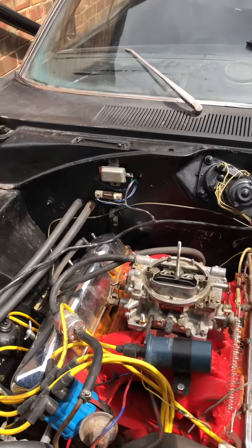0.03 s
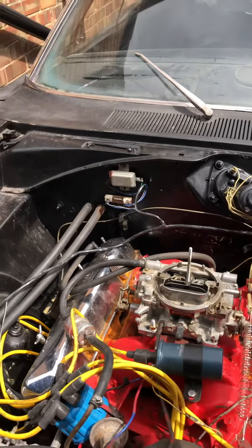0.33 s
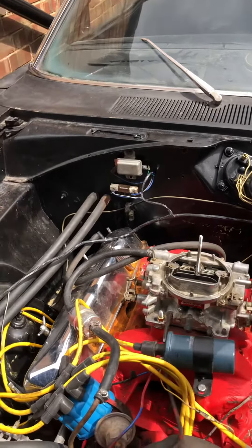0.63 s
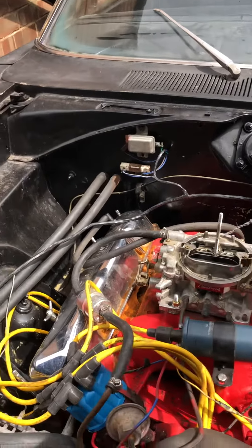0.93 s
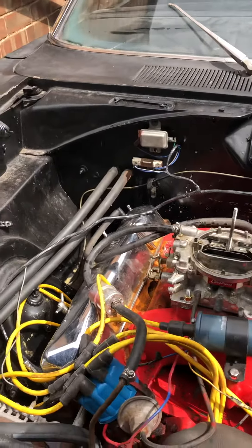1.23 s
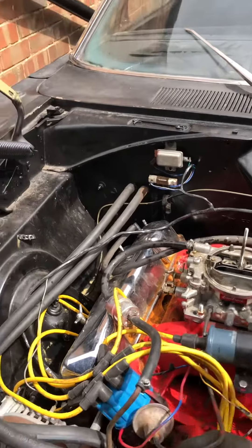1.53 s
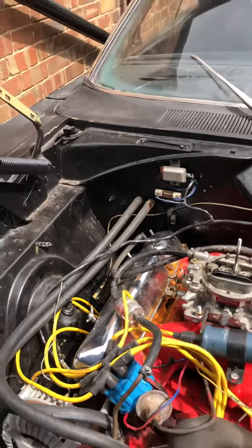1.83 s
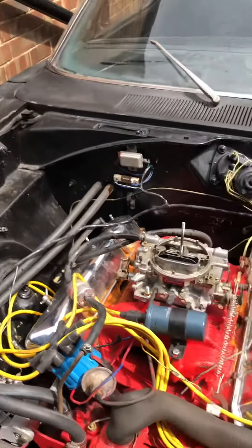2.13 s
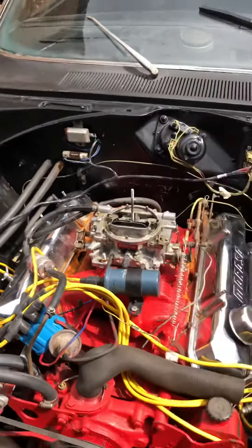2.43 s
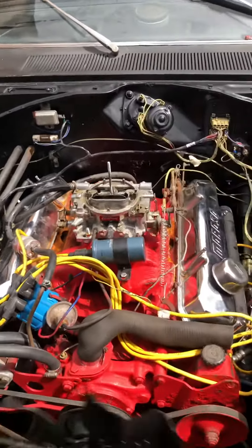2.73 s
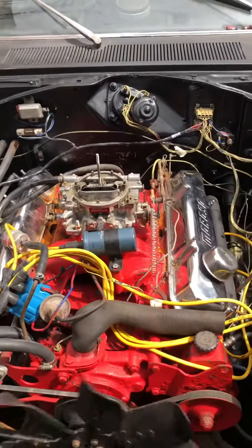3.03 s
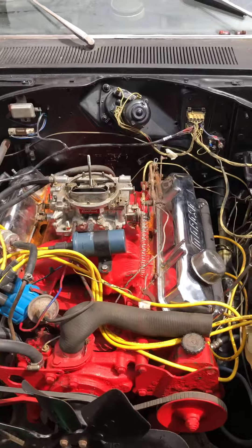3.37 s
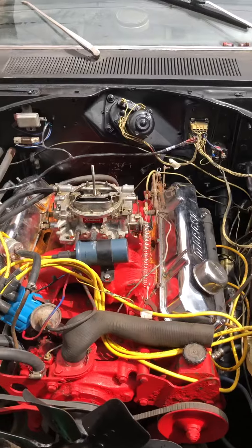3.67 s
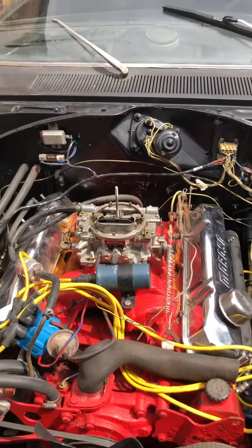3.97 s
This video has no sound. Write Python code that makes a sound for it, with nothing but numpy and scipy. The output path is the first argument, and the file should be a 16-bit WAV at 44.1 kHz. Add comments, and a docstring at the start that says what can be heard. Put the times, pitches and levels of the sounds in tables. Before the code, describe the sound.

A V8 engine catches with whistling gulps of air, then runs raggedly with uneven exhaust thumps and sharp carburettor spits. It stalls with a low hum and a light clack, heard outdoors close over the open engine bay.

```python
"""Beside a brick wall, close over an open engine bay, a V8 catches, runs raggedly and stalls.
The bare carburettor gulps air and whistles, rushes, then spits in separate bursts, while uneven
firings thump in the exhaust pipe and shake the bay's panels. The belt chirps now and then.
At the end the exhaust hums out and the crank rocks back with a last clack."""
import sys
import numpy as np
from scipy import signal
from scipy.fft import rfft, irfft
from scipy.io import wavfile
from scipy.ndimage import uniform_filter1d

SR = 44100
rng = np.random.default_rng(int(sys.argv[2]) if len(sys.argv) > 2 else 0)


def wav_out(sig):
    """Save sig, one row per channel (or a flat mono array), as 16-bit PCM at SR to the path in sys.argv[1]."""
    wavfile.write(sys.argv[1], SR, np.round(np.clip(np.atleast_2d(sig).T, -1, 1) * 32767).astype(np.int16))


N = 176400
T = np.arange(N) / SR


def amp(db):
    """Turns decibels into a number to multiply by."""
    return 10 ** (np.asarray(db) / 20)


def unit(x):
    """Scales a signal to an average (rms) size of 1."""
    return x / np.sqrt(np.mean(x ** 2) + 1e-20)


def curve(points):
    """Draws straight lines through (time [s], value) points."""
    return np.interp(T, *np.transpose(points))


def phase(hz):
    """The angle a wave has turned through at a steady or moving pitch."""
    return 2 * np.pi * np.cumsum(hz * np.ones(N)) / SR


def wander(hz):
    """A smooth random wobble; a higher hz makes it quicker."""
    keep_slow = np.exp(-(np.fft.rfftfreq(N, 1 / SR) / hz) ** 2)
    return unit(irfft(rfft(rng.standard_normal(N)) * keep_slow, N))


def noise(colour, patchy_db=0):
    """Noise with a given balance of low and high pitches, and shifting patches like swirling air."""
    _, _, spectra = signal.stft(rng.standard_normal(N), SR, nperseg=512, noverlap=384)
    patches = uniform_filter1d(rng.standard_normal(spectra.shape), size=3, axis=0)
    patches = unit(uniform_filter1d(patches, size=12, axis=1))
    patchy = signal.istft(spectra * amp(patchy_db * patches), nperseg=512, noverlap=384)[1][:N]
    hz = np.fft.rfftfreq(N, 1 / SR) + 1
    colour_hz, colour_db = np.transpose(colour)
    balance = amp(np.interp(np.log(hz), np.log(colour_hz), colour_db))
    bass_cut = np.minimum(hz / colour_hz[0], 1) ** 2
    return unit(irfft(rfft(patchy) * balance * bass_cut, N))


def whistle(hz, width_hz):
    """A tone made by swirling air; more width makes it fuzzier."""
    angle = phase(hz)
    return wander(width_hz / 2) * np.cos(angle) + wander(width_hz / 2) * np.sin(angle)


def burst(start, rise, hold, fall):
    """A loudness shape that rises, holds and dies away (all in seconds)."""
    return np.clip((T - start) / rise, 0, 1) * np.exp(-np.maximum(T - start - rise - hold, 0) / fall)


def together(shapes):
    """Joins loudness shapes by adding their power."""
    return np.sqrt(sum(shape ** 2 for shape in shapes))


def linger(shape, fall_s):
    """Gives a loudness shape a fading tail, as if it rang on."""
    decay = np.exp(-1 / (fall_s * SR))
    return np.sqrt(signal.lfilter([1 - decay], [1, -decay], shape ** 2))


# tone of the outdoor air (frequency [Hz], relative level [dB])
AIR_COLOUR = [(29, -52), (50, -15.5), (119, -8), (151, -14), (652, -21.5), (1030, -16.5), (1470, -28.5),
              (15500, -55)]
def outdoor_air():
    """The open air is a quiet, steady rumble."""
    return amp(-47) * noise(AIR_COLOUR, patchy_db=0.5)


# rustles after the stall (time [s], level [dB])
RUSTLES = [(3.685, -66), (3.79, -65), (3.91, -59.5), (3.97, -59)]
def rustles():
    """Faint, brief rustles sound in the quiet."""
    loudness = together(amp(db) * burst(s, rise=0.013, hold=0.013, fall=0.013) for s, db in RUSTLES)
    return loudness * whistle(hz=5400, width_hz=1800)


# echoes off the bay's panels and the wall (delay [s], strength [ratio])
ECHOES = [(.0017, 0.16), (.0031, -0.074), (.0083, 0.0011)]
def yard(sound):
    """Sound bounces off the bay and the wall, then leaves a short tail whose treble fades first."""
    t = T[:SR // 2]
    scatter = rng.standard_normal(len(t))
    lows = signal.sosfiltfilt(signal.butter(2, 5000, fs=SR, output="sos"), scatter)
    highs = scatter - lows
    low_fade_s, high_fade_s = 0.28, 0.18
    response = (lows * amp(-60 * t / low_fade_s) + highs * amp(-60 * t / high_fade_s)) * (t > 0.012)
    response *= amp(-10) / np.linalg.norm(response)
    response[0] = 1  # the direct sound
    for delay, strength in ECHOES:
        response[round(delay * SR)] += strength
    return signal.fftconvolve(sound, response / np.linalg.norm(response))[:N]


# loudness of the turning parts (time [s], level [dB])
WHIRR_LEVEL = [(0, -25.5), (2.3, -31.5), (2.57, -33), (2.95, -41), (3.12, -45), (3.33, -47), (3.44, -75)]
# their tone (frequency [Hz], relative level [dB])
WHIRR_COLOUR = [(180, -25), (300, -0.5), (600, -21.5), (1370, -9), (15500, -24)]
def whirr():
    """The belt, fan and valve gear whirr, fading as the engine stops."""
    return amp(curve(WHIRR_LEVEL)) * noise(WHIRR_COLOUR, patchy_db=5)


# chirps of the belt (time [s], level [dB])
CHIRPS = [(0.413, -20.5), (1.06, -16.5), (3.244, -32)]
def belt_chirps():
    """The belt gives short, very high chirps that slide upwards."""
    length_s, start_hz, rise_hz_per_s = 0.034, 11250, 11000
    chirps = np.zeros(N)
    for s, db in CHIRPS:
        age = np.clip(T - s, 0, length_s)
        swell = amp(db) * np.sin(np.pi * age / length_s) ** 2
        chirps += swell * whistle(start_hz + rise_hz_per_s * age, width_hz=200)
    return chirps


# clacks of the crank (time [s], level [dB])
CLACKS = [(3.21, -36.5), (3.256, -41.5), (3.351, -31)]
# their tone (frequency [Hz], relative level [dB])
CLACK_COLOUR = [(200, 6.5), (800, 1.5), (2000, -11), (12000, -16), (15500, -38)]
def crank_clacks():
    """The crank, the engine's main shaft, clacks as it stops and rocks back."""
    knocks = together(amp(db) * burst(s, rise=0.0043, hold=0.0076, fall=0.0058) for s, db in CLACKS)
    return knocks * noise(CLACK_COLOUR)


# loudness of the exhaust's last hum (time [s], level [dB])
HUM_LEVEL = [(3.02, -37), (3.055, -19.5), (3.13, -19.5), (3.25, -29.5), (3.3, -41), (3.46, -45),
             (3.52, -83)]
def exhaust_hum():
    """A clean low tone sinks and dies in the exhaust as the engine coasts to rest."""
    start_hz, sag_hz_per_s = 74.3, 6.5
    age = T - HUM_LEVEL[0][0]
    tone = np.sqrt(2) * np.sin(phase(start_hz - sag_hz_per_s * age))
    return amp(curve(HUM_LEVEL)) * (age > 0) * tone


# gulps as the engine catches (time [s], length [s], relative air level [dB], relative whine level [dB])
GULPS = [(0, 0.038, -25.5, -34), (0.067, 0.02, -20, -21), (0.12, 0.037, -20.5, -31),
         (0.186, 0.027, -20.5, -24.5), (0.252, 0.041, -23, -22.5), (0.327, 0.067, -24, -24.5),
         (0.406, 0.05, -22.5, -24), (0.5, 0.045, -21.5, -23)]
# tone of the gulped air (frequency [Hz], relative level [dB])
GULP_COLOUR = [(420, -1.5), (650, -12.5), (1100, 1.5), (2400, 0), (6500, -2.5), (10000, -7), (15500, -21)]
# steady notes of the carburettor's throat (pitch [Hz], width [Hz], relative level [dB])
THROAT_NOTES = [(456, 30, -14), (820, 25, -14), (1100, 25, -6.5), (1470, 30, -9)]
# path of the whine (time [s], pitch [Hz])
WHINE_PITCH = [(.15, 2546), (.2, 2014), (.28, 1605), (.345, 1588), (.38, 1484), (.42, 1530), (.46, 1437),
               (.515, 1601), (.56, 1415)]
# the whine's tones at 1, 2 and 3 times its pitch (width [Hz], relative level [dB])
WHINE_TONES = [(45, 0), (300, 1.5), (450, -4.5)]
def carburettor_gulps():
    """Gulps of air make the carburettor's throat whistle, with a whine that slides down in pitch and sags with
    the gulps."""
    edge_s = 0.0094
    shapes = [burst(s, edge_s, length - edge_s, edge_s) for s, length, _, _ in GULPS]
    air_level = together(amp(db) * shape for shape, (_, _, db, _) in zip(shapes, GULPS))
    whine_level = together(amp(db) * shape for shape, (_, _, _, db) in zip(shapes, GULPS))
    throat = sum(amp(db) * whistle(hz, width) for hz, width, db in THROAT_NOTES)
    whine_hz = curve(WHINE_PITCH)
    whine = sum(amp(db) * whistle(k * whine_hz, width) for k, (width, db) in enumerate(WHINE_TONES, 1))
    air = amp(5) * noise(GULP_COLOUR, patchy_db=3)
    return air_level * (throat + air) + whine_level * whine


# air drawn through the carburettor (time [s], relative level [dB])
RUSH_LEVEL = [(0, -18), (.45, -28), (.495, -32), (.52, -30), (.58, -18), (.61, -15), (.73, -15), (.77, -12),
              (.9, -14), (1.01, -16), (1.14, -12), (1.20, -12), (1.24, -23.5), (1.30, -15.5),
              (1.385, -12.5), (1.46, -19.5), (1.52, -42), (1.58, -86.5)]
# its tone (frequency [Hz], relative level [dB])
RUSH_COLOUR = [(240, -32), (400, -1.5), (987, -1.5), (2030, -1.5), (4350, 0), (7800, -6), (15500, -21.5)]
def carburettor_rush():
    """The pistons suck in air so quickly that their strokes blur into a throbbing, rasping rush."""
    strokes_per_s = 49 * (1 + 0.14 * wander(hz=6.3))
    throb_db = 2.33 * np.sin(phase(strokes_per_s))
    rasp_db = 1.1 * wander(hz=393)
    return amp(curve(RUSH_LEVEL) - 1 + throb_db + rasp_db) * noise(RUSH_COLOUR, patchy_db=3.5)


# firings in the exhaust (time [s], relative level [dB])
FIRINGS = [(.006, -6.5), (.045, -6.5), (.095, -17.5), (.125, -17), (.18, -25.5), (.269, -22), (.31, -23),
           (.42, -26.5), (0.532, -17), (.585, -19.5), (.656, -7.5), (.736, -10), (.777, -16), (.818, -18),
           (0.921, -11), (.971, -11), (1.012, -8), (1.091, -13), (1.137, -21), (1.165, -15), (1.231, -8.5),
           (1.28, -11), (1.324, -12), (1.369, -13.5), (1.424, -7.5), (1.473, -6.5), (1.508, -14),
           (1.556, -10), (1.611, -7.5), (1.654, -8), (1.703, -10.5), (1.772, -19.5), (1.83, -8.5),
           (1.87, -17), (1.909, -17.5), (1.957, -14), (1.999, -14), (2.052, -15.5), (2.124, -13),
           (2.172, -14.5), (2.206, -12), (2.251, -7.5), (2.33, -9.5), (2.388, -10.5), (2.432, -13.5),
           (2.509, -10.5), (2.545, -16), (2.625, -12), (2.686, -12), (2.745, -21), (2.787, -12.5),
           (2.84, -20), (2.902, -20), (2.991, -24.5)]
# the pipe's low note (time [s], pitch [Hz])
PIPE_PITCH = [(0, 53.3), (.1, 69.4), (.6, 61.3), (1.3, 71.1), (1.7, 69.2), (2.0, 65.13), (2.25, 76.6),
              (2.4, 67.5), (3.0, 70.6)]
# how hard the firings shake the bay's panels (time [s], relative level [dB])
PANEL_SHAKE = [(.55, -8), (.75, 1), (2.3, 0), (2.6, -12.5), (2.8, -0.5)]
# tone of those panels (frequency [Hz], relative level [dB])
PANEL_COLOUR = [(80, -20.5), (118, 0.5), (160, -2.5), (190, 2), (300, -8), (900, -16), (3000, -63.5)]
def exhaust_thumps():
    """Each firing swells the pipe's boom, one low note that wanders in pitch, and shakes the panels of the bay."""
    rise_s, fall_s = 0.015, 0.019
    push = together(amp(db) * np.exp(-((T - s) / np.where(T < s, rise_s, fall_s)) ** 2)
                    for s, db in FIRINGS)
    pipe_hz = curve(PIPE_PITCH) + 3.5 * wander(hz=25.7)
    swell = together([push, amp(-8.5) * linger(push, fall_s=0.085)])
    boom = amp(-0.4) * swell * np.sqrt(2) * np.sin(phase(pipe_hz))
    panels = amp(curve(PANEL_SHAKE) - 9) * linger(push, fall_s=0.017) * noise(PANEL_COLOUR)
    return boom + panels


# spits through the carburettor (time [s], relative hiss level [dB], relative pop level [dB])
SPITS = [(0.618, -15.5, -13), (0.693, -14, -25.5), (.884, -14.5, -26), (.972, -16, -11.5),
         (1.106, -17, -31), (1.197, -18.5, -12), (1.247, -20, -9.5), (1.292, -17.5, -31),
         (1.388, -17.5, -15.5), (1.439, -20, -11.5), (1.529, -17, -12.5), (1.577, -17, -9),
         (1.619, -18.5, -9), (1.659, -18, -11), (1.801, -17, -12), (1.855, -28, -28), (1.906, -20, -19.5),
         (1.965, -17, -16.5), (2.021, -17.5, -11), (2.076, -20, -37), (2.101, -17.5, -13.5),
         (2.129, -17, -15), (2.155, -17, -23), (2.179, -16, -13), (2.208, -15.5, -24), (2.233, -21, -16.5),
         (2.308, -16.5, -18), (2.356, -21.5, -24.5), (2.408, -26.5, -23), (2.46, -19.5, -21),
         (2.589, -20.5, -22.5), (2.655, -18, -18), (2.762, -17, -17), (2.79, -15, -23.5), (2.932, -30, -45)]
# tone of the hiss (frequency [Hz], relative level [dB])
HISS_COLOUR = [(180, -40.5), (300, -6), (720, -11.5), (1300, -9), (3570, -11), (7880, -10.5), (15500, -18)]
# tone of the pop (frequency [Hz], relative level [dB])
POP_COLOUR = [(200, -10), (750, -7), (1250, -5), (2100, -23.5), (9000, -51.5)]
# the throat's higher note (pitch [times the ring's pitch], width [Hz], relative level [dB])
THROAT_OVERTONE = [(1.76, 259.6, -15)]
def carburettor_spits():
    """Each spit pops, rings the throat and shoots out a crackling hiss; a metal panel hums after it."""
    jet = together(amp(db) * burst(s, rise=0.0057, hold=0.011, fall=0.014) for s, db, _ in SPITS)
    pop = together(amp(db) * burst(s, rise=0.0025, hold=0.002, fall=0.013) for s, _, db in SPITS)
    # the throat rings at a slightly different pitch for each spit
    pitches_hz = 1130 * (1 + 0.11 * rng.uniform(-1, 1, len(SPITS) + 1))
    ring_hz = pitches_hz[np.searchsorted([s for s, _, _ in SPITS], T)]
    roughness = 0.7 * wander(hz=300)
    ring = amp(-6.5) * np.sqrt(2) * np.sin(phase(ring_hz) + roughness)
    overtone = sum(amp(db) * whistle(k * ring_hz, width) for k, width, db in THROAT_OVERTONE)
    crackle_db = 1.3 * wander(hz=501)
    hiss = amp(2.5 + crackle_db) * jet * (noise(HISS_COLOUR, patchy_db=2) + overtone)
    panel = amp(-10.5) * linger(jet, fall_s=0.051) * whistle(hz=227.4, width_hz=17)
    puff = amp(-2.5) * noise(POP_COLOUR, patchy_db=4.5)
    return hiss + panel + pop * (ring + puff)


def scene():
    """The engine over quiet outdoor air; the turning parts and the carburettor echo in the yard."""
    background = outdoor_air() + rustles()
    turning_parts = whirr() + belt_chirps() + crank_clacks()
    exhaust = exhaust_hum() + exhaust_thumps()
    carburettor = carburettor_gulps() + carburettor_rush() + carburettor_spits()
    return (background + exhaust + yard(turning_parts + carburettor))[None]


def record(dry):
    """Rounds off the loudest peaks, then cuts the very highest treble."""
    rounded = dry / (1 + dry ** 8) ** (1 / 8)
    treble_cut = signal.firwin(511, cutoff=15850, window=("kaiser", 9), fs=SR)
    return signal.oaconvolve(rounded, treble_cut[None], "same")


dry = scene()
out = record(dry)
wav_out(out)
```